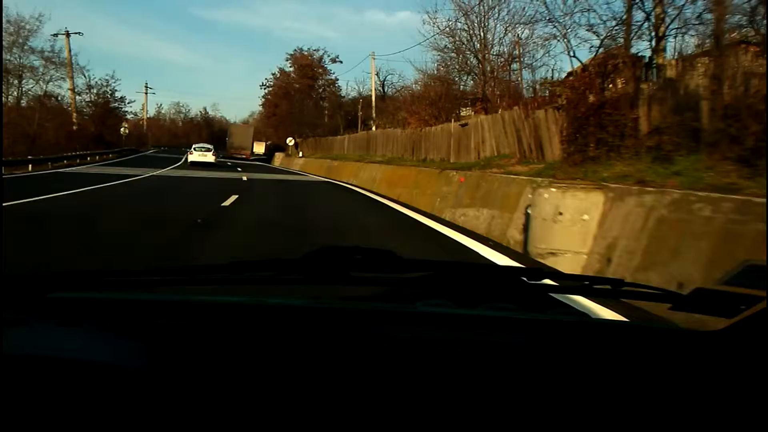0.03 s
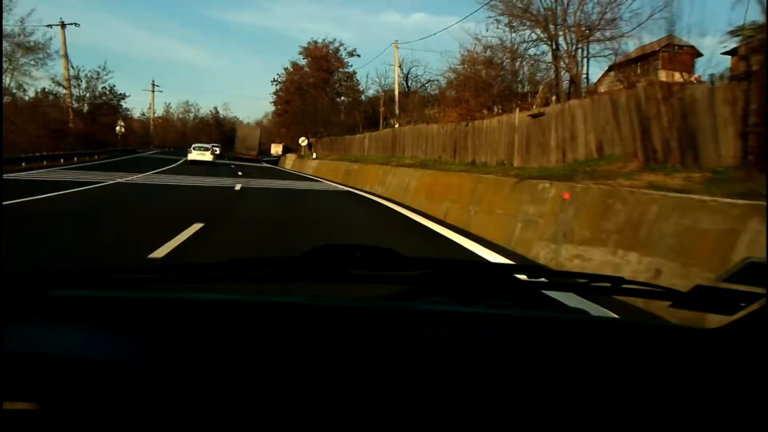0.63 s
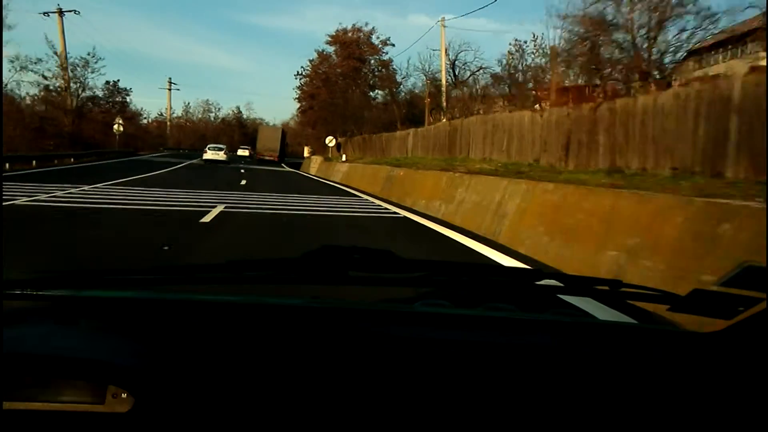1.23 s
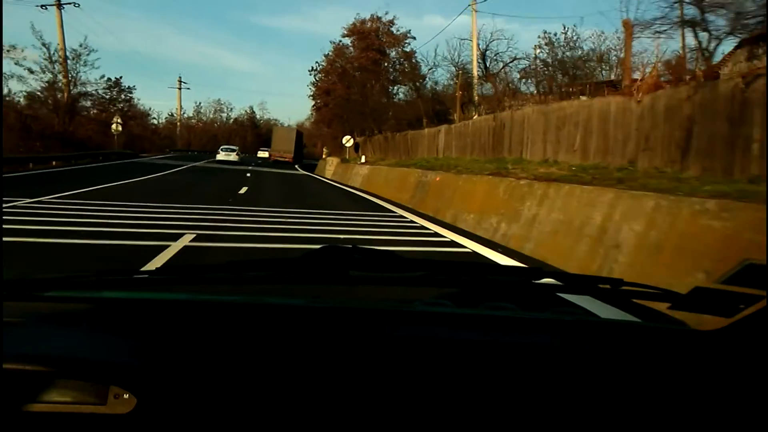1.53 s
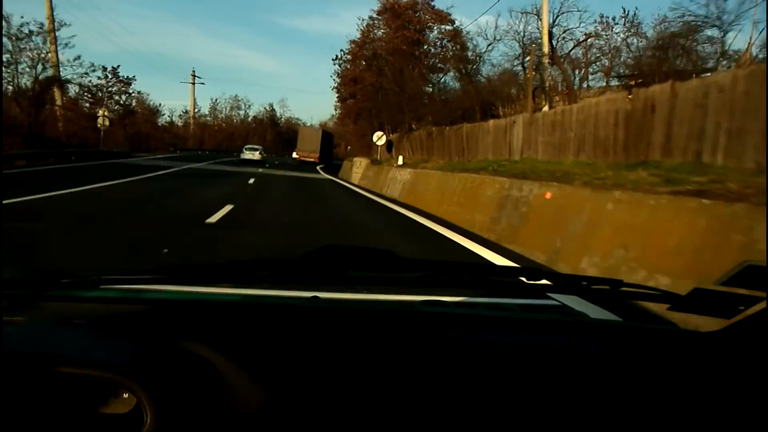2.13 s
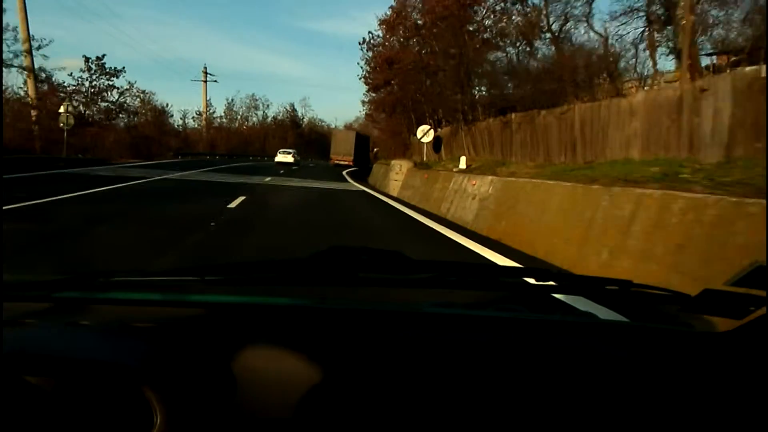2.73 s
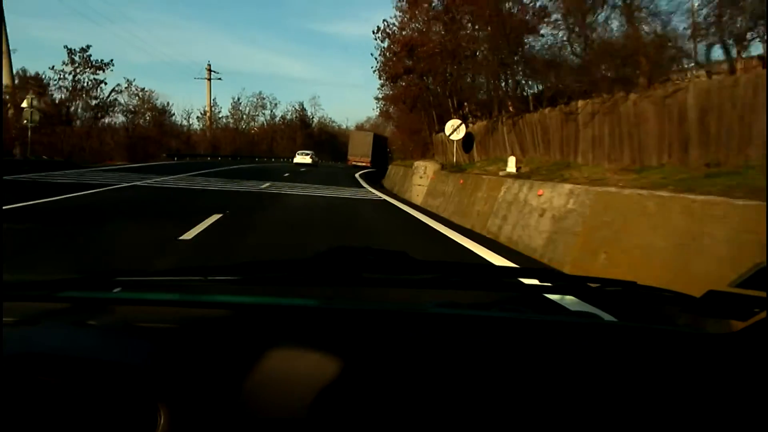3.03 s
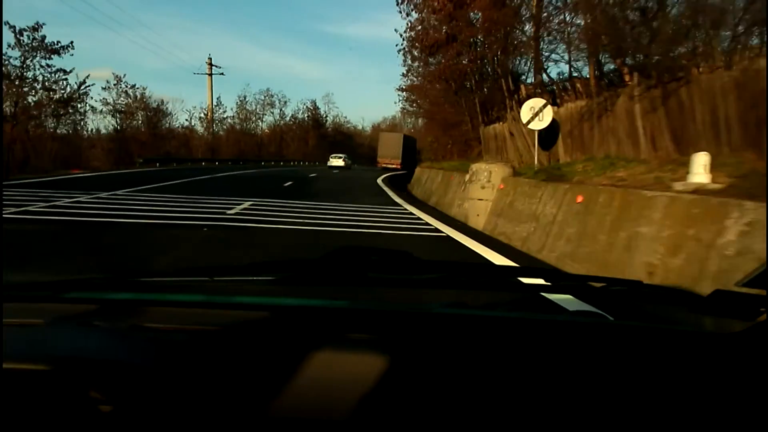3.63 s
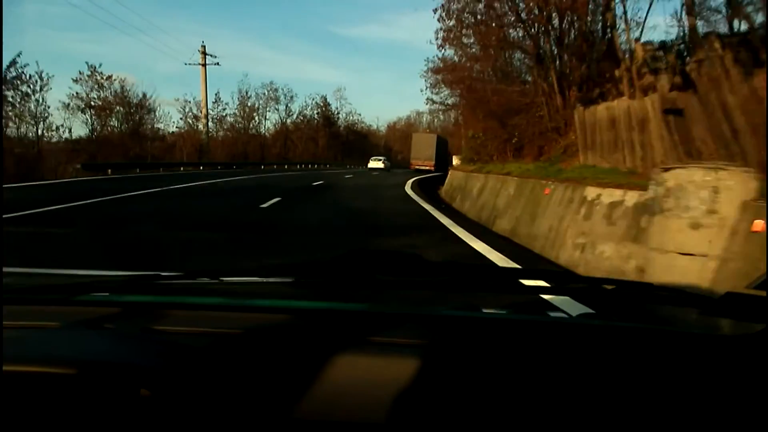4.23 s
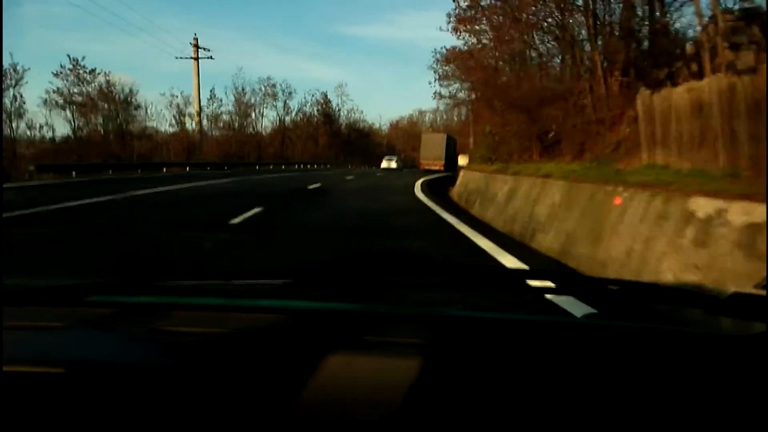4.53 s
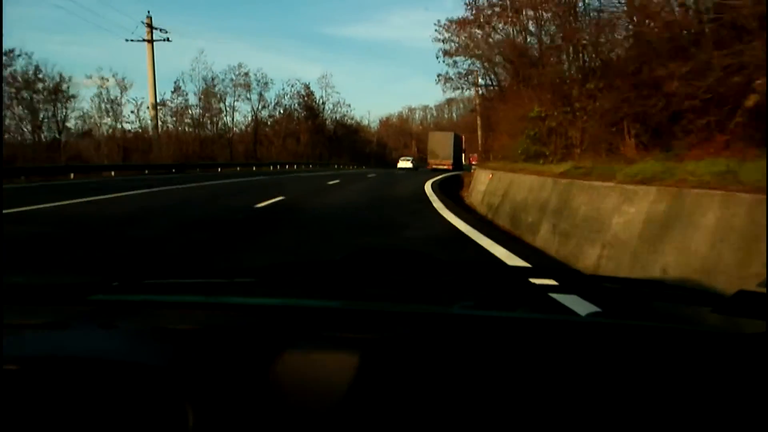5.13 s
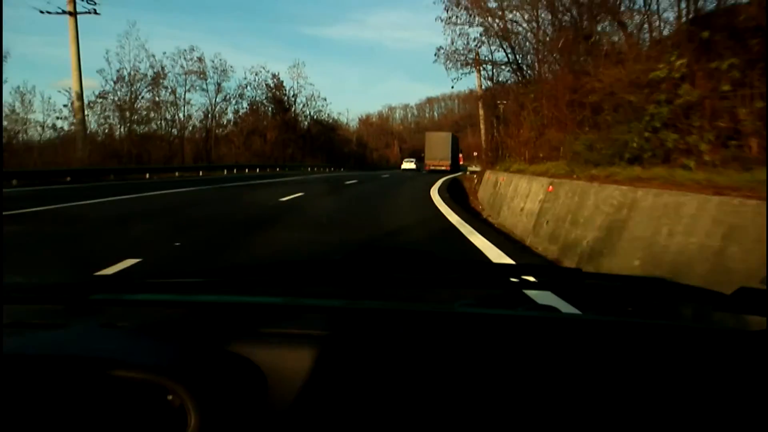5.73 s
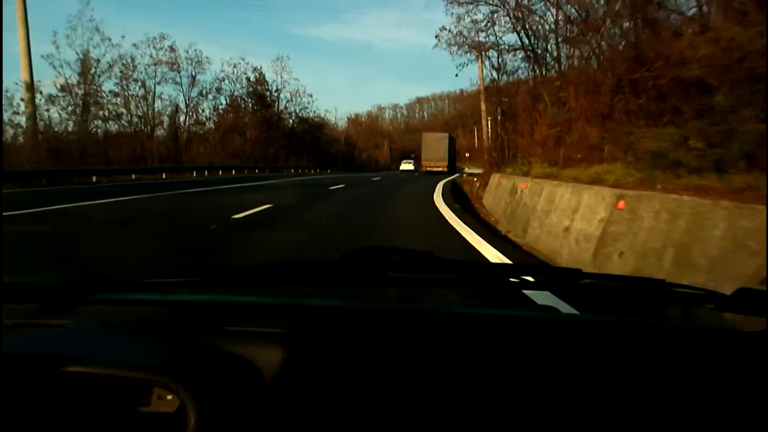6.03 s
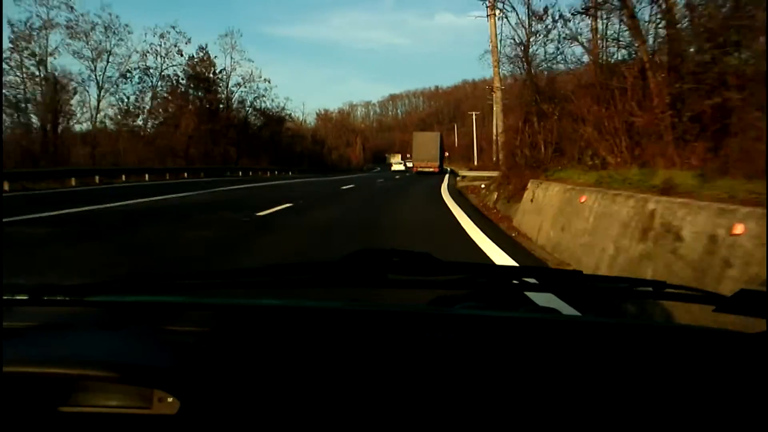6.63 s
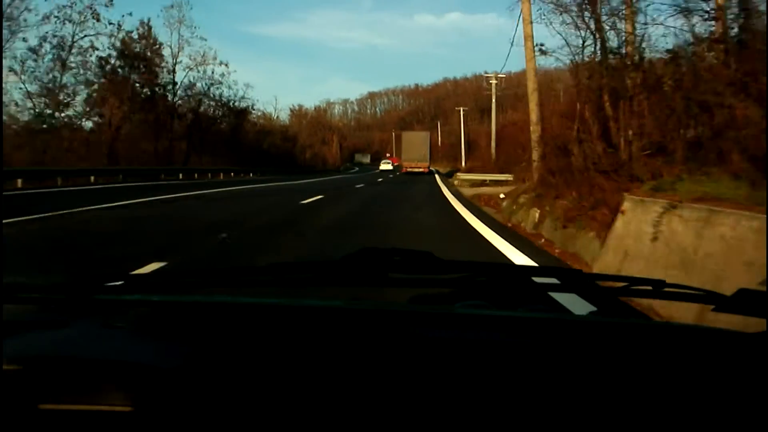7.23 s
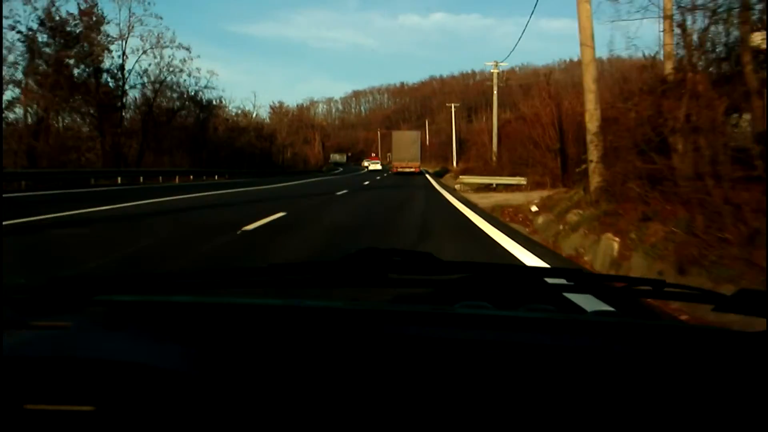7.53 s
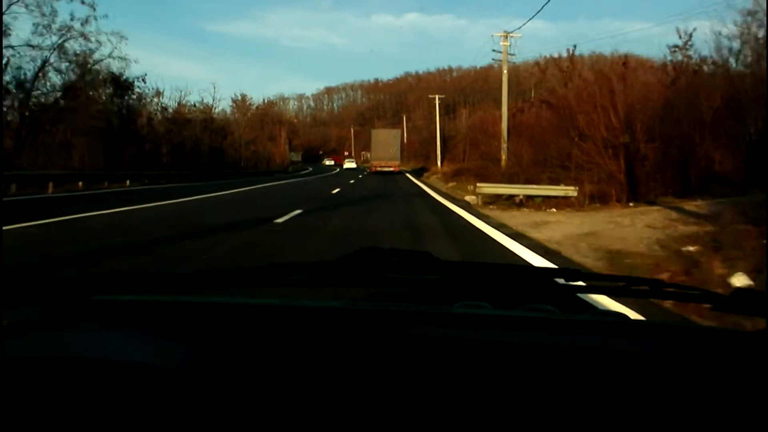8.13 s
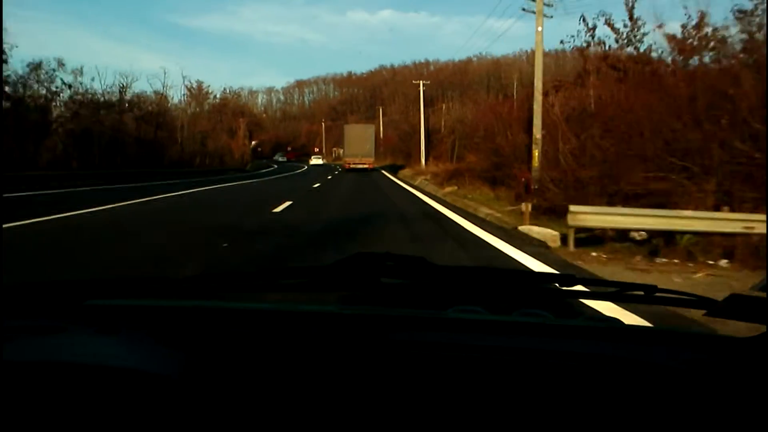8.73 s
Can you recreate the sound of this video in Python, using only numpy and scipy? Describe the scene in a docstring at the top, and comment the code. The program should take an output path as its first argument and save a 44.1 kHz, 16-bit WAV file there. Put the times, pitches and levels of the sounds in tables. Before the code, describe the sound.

Heard from behind the windscreen of a moving car, the engine drones and slowly rises in pitch over tyre roar and low body rumble. Three times in the first half, the wheels drum over groups of raised stripes, with rapid thumps, clacking dashboard plastic and tiny metallic jingles. After that, a loose piece of trim on the left starts a thin, high buzz as the car keeps gathering speed.

```python
"""Small car gathering speed on a main road

From behind the windscreen, the engine's firings drone over tyre roar and body rumble.
Three groups of raised stripes thump the wheels and rattle the dashboard plastic and small fittings.
As the revs climb, a loose bit of trim to the left of the microphone buzzes once per firing.
The recorder's gain ducks under the thumps and creeps back."""
import sys
import numpy as np
from scipy import signal
from scipy.fft import rfft, irfft
from scipy.io import wavfile
from scipy.ndimage import uniform_filter1d, minimum_filter1d, map_coordinates

SR = 44100
rng = np.random.default_rng(int(sys.argv[2]) if len(sys.argv) > 2 else 0)


def store_wav(level_fs):
    """Save 16-bit WAV to argv[1]."""
    pcm = np.round(np.clip(np.atleast_2d(level_fs), -1, 1) * 32767)
    wavfile.write(sys.argv[1], SR, pcm.T.astype(np.int16))


N = 396900
TIME = np.arange(N) / SR


def from_db(db):
    """Decibels to gain."""
    return 10 ** (np.asarray(db) / 20)


def rms_one(x):
    """Scale to unit rms."""
    return x / np.sqrt(np.mean(x ** 2) + 1e-20)


def bell(x, centre, half_width):
    """A smooth hump of height 1."""
    return np.exp(-((x - centre) / half_width) ** 2)


def in_time(points):
    """A curve of (seconds, value) points, sample by sample."""
    return np.interp(TIME, *np.transpose(points))


def at_hz(points, hz):
    """Read a table on a log-frequency axis."""
    f, value = np.transpose(points)
    return np.interp(np.log(hz), np.log(f), value)


def drift(rate):
    """A smooth random wander of spread about 1 that turns about rate times a second."""
    knots = rng.standard_normal(4096)
    return map_coordinates(knots, [TIME[::50] * rate], order=3, mode="wrap").repeat(50)[:N]


# The cabin at the stereo microphone. Each row: frequency in Hz, left-right correlation.
CABIN_LIKENESS = [(30, 0.95), (100, 0.99), (300, 0.98), (700, .95), (1500, 0.84), (3500, 0.85),
                  (6000, 0.61), (9000, 0.64), (10000, -0.13), (11500, -0.75), (16000, -0.35)]
def stereo_noise(spectrum):
    """Noise coloured by (Hz, dB) points, whose two sides part toward the treble; rms 1."""
    hz = np.maximum(np.fft.rfftfreq(N, 1 / SR), 1)
    outside = np.maximum(hz / spectrum[-1][0], spectrum[0][0] / hz).clip(1)
    mid, side = rfft(rng.standard_normal((2, N))) * from_db(at_hz(spectrum, hz)) / outside ** 2
    alike = np.clip(at_hz(CABIN_LIKENESS, hz), -1, 1)
    return rms_one(irfft(np.sqrt(1 + alike) * mid + np.sqrt(1 - alike) * side * [[1], [-1]], N))


def resonate(x, hz, width_hz):
    """Pass a sound through a two-pole resonance; rms 1."""
    r, w = np.exp(-np.pi * width_hz / SR), 2 * np.pi * hz / SR
    return rms_one(signal.lfilter([1, 0, -1], [1, -2 * r * np.cos(w), r * r], x))


def ring_modes(force, modes):
    """A force rings a set of (Hz, dB, t60) modes, neighbours in opposite phase."""
    out = 0
    for k, (hz, db, t60) in enumerate(modes):
        r, w = from_db(-60 / (t60 * SR)), 2 * np.pi * hz / SR
        ringing = signal.lfilter([0, np.sin(w)], [1, -2 * r * np.cos(w), r * r], force + 1e-18)
        out = out + (-1) ** k * from_db(db) * ringing
    return out


def taps(rows):
    """One click for each (seconds, dB) row."""
    s, db = np.transpose(rows)
    out = np.zeros(N)
    out[np.round(s * SR).astype(int)] = from_db(db)
    return out


def fade(clicks, t60):
    """Each click becomes a dying envelope of its own height."""
    return signal.lfilter([1], [1, -from_db(-60 / (t60 * SR))], clicks + 1e-18)


# The engine up ahead, pulling in one gear. Each row: time in seconds, firings per second.
FIRING_RATE = [(0, 81.6), (2.6, 89.3), (5.3, 95.9), (7, 99.55), (9, 104.2)]
def revs():
    """The climbing firing rate, and a running count of firings that wavers slightly."""
    firing_hz = in_time(FIRING_RATE)
    return firing_hz, np.cumsum(firing_hz * (1 + .001 * drift(9))) / SR


# The drone as it reaches the cabin. Each row: time in seconds, level in dB.
DRONE_LEVEL = [(0, -19.5), (1.4, -15), (2.1, -11), (2.55, -16), (3, -9), (3.3, -14.5), (3.75, -10),
               (4.15, -15), (4.8, -11), (5.3, -11), (6.2, -10), (6.55, -14.5), (6.9, -12), (7.15, -24.5),
               (7.45, -22.5), (7.75, -11.5), (9, -8)]
# Weaker engine lines. Each row: multiple of the firing rate, level in dB before any lift.
ENGINE_OVERTONES = [(2, -31), (3, -30.5), (4, -32.5), (4.5, -46.5), (5, -46), (6, -43.5), (7, -41.5),
                    (8, -49), (8.5, -45.5), (11, -47.5), (12, -47.5), (14, -50)]
# Panel resonances around the microphone. Each row: centre in Hz, half width in Hz, lift in dB.
CABIN_RESONANCES = [(252, 3, 8), (274.5, 3.5, 11), (339.5, 2.6, 14), (362, 6, 5), (522, 12, 7.5),
                    (778, 16, 3)]
GEAR_ORDER, GEAR_DB = 5.67, -35
def engine(firing_hz, firings):
    """The firing drone; overtones and gear whine swell as they sweep through the panel resonances."""
    def line(order, db, unsteady_db):
        gain = from_db(db + unsteady_db * drift(14))
        return gain * np.sin(2 * np.pi * (order * firings + rng.random()))
    out = line(1, in_time(DRONE_LEVEL), unsteady_db=0.96)
    for order, db in [*ENGINE_OVERTONES, (GEAR_ORDER, GEAR_DB)]:
        lift_db = sum(peak * bell(order * firing_hz, hz, width) for hz, width, peak in CABIN_RESONANCES)
        out = out + line(order, db + lift_db, unsteady_db=1.0)
    return out * from_db([[.2], [-.2]])


# The body's rumble, all around. Each row: frequency in Hz, relative density in dB.
RUMBLE_SPECTRUM = [(15, -0.5), (25, -32), (32, -1.5), (41, 2), (58, -0.5), (75, -9.5), (110, -8.5)]
# Uneven asphalt under the car. Each row: centre in seconds, half length in seconds, lift in dB.
ROUGH_PATCHES = [(3.05, .25, 3), (5.5, 0.17, 5.5), (6.298, 0.08, 6)]
def body_rumble():
    """The body rumbles, more on uneven asphalt and after each blow of the rear axle."""
    uneven_db = sum(db * bell(TIME, s, length) for s, length, db in ROUGH_PATCHES)
    gain = from_db(-20 + uneven_db) + from_db(-10) * body_shaking(t60=0.66)
    return gain * stereo_noise(RUMBLE_SPECTRUM)


# The tyres, heard from inside. Each row: frequency in Hz, relative density in dB.
ROAR_SPECTRUM = [(70, -10), (115, 3), (155, -3), (205, 2), (270, -4), (370, -3.5), (480, -9.5), (700, -15),
                 (1050, -18), (1500, -22.5), (2000, -30.5), (3000, -48)]
def tyre_roar(speed):
    """Rolling tyres roar louder with speed, which is 1 at its mean."""
    return from_db(-20.5 + 0.61 * drift(18)) * speed ** 1.4 * stereo_noise(ROAR_SPECTRUM)


# The hiss above the roar. Each row: frequency in Hz, relative density in dB.
HISS_SPECTRUM = [(1200, 1), (2200, 4), (3200, -1), (4500, -6.5), (6500, -10.5), (9000, -13.5), (10500, -14),
                 (12000, -16), (16000, -25)]
# Resonances of the engine bay ahead. Each row: centre in Hz, width in Hz, level in dB at top speed.
BAY_WHINES = [(714, 33, -45.5), (1124, 23, -44.5), (1412, 20, -44), (2230, 64, -50.5), (3270, 530, -52),
              (4190, 38, -58.5), (8180, 50, -58), (8380, 55, -59)]
def hiss_and_whine(speed, firings):
    """Hiss grows with speed, rings in the engine bay and pulses lightly with the firings."""
    pulsing = 1 + 0.091 * np.sin(2 * np.pi * firings)
    hiss = from_db(-43 + .5 * drift(25)) * speed ** 0.57 * stereo_noise(HISS_SPECTRUM)
    flat_noise = stereo_noise([(800, 0), (10000, 0)])
    whine = sum(from_db(db) * resonate(flat_noise, hz, width) for hz, width, db in BAY_WHINES)
    return pulsing * (hiss + whine * (speed / speed.max()) ** 3.8)


# Groups of stripes under the front axle; the car is already on the first as the scene opens.
# Each row: start in seconds, relative boom in dB, relative knock in dB.
STRIPE_GROUPS = [(-.27, -1, -16), (2.052, 0.5, 0.5), (4.238, 0.5, 1.5)]
BOOM_COLUMN, KNOCK_COLUMN = 1, 2
STRIPE_COUNT, STRIPE_GAP_S, REAR_LAG_S = 6, .072, .182
def axle_hits(column, db, lag_s=0):
    """One click for every stripe that an axle crosses, evenly spaced and slightly uneven in force."""
    rows = np.array([(group[0] + lag_s + k * STRIPE_GAP_S,
                      db + group[column] - 0.3 * rng.standard_normal())
                     for group in STRIPE_GROUPS for k in range(STRIPE_COUNT)])
    return taps(rows[rows[:, 0] >= 0])


def body_shaking(t60):
    """How hard the body shakes: renewed by each blow of the rear axle, then dying; peak 1."""
    level = uniform_filter1d(fade(axle_hits(BOOM_COLUMN, 0, REAR_LAG_S), t60), size=800)
    return level / level.max()


# Modes of the body around the microphone, then of the tyres below it.
# Each row: frequency in Hz, relative level in dB, t60 in seconds.
BODY_MODES = [(30, -10, .15), (42, -1.5, .26), (58, -6, .16)]
TYRE_MODES = [(128.3, 3, 0.18), (128.4, 2, 0.17), (180, -7, 0.086), (217, -8.5, 0.037),
              (340.5, -17.5, 0.12)]
SUSPENSION_HZ = 75
def stripes():
    """Each stripe knocks front tyres, then rear, and booms the body through the soft suspension."""
    blows = axle_hits(BOOM_COLUMN, db=-11) + axle_hits(BOOM_COLUMN, db=-2, lag_s=REAR_LAG_S)
    softened = signal.sosfilt(signal.butter(2, SUSPENSION_HZ, fs=SR, output="sos"), blows + 1e-18)
    boom = ring_modes(softened, BODY_MODES)
    edges = axle_hits(KNOCK_COLUMN, db=-2.1) + axle_hits(KNOCK_COLUMN, db=-6, lag_s=REAR_LAG_S)
    # the tread rolls over the edge for a moment, so the knock is a rough push
    push = fade(edges, t60=.07) * rng.standard_normal(N)
    knock = from_db(-22) * ring_modes(push, TYRE_MODES)
    return signal.sosfilt(signal.butter(2, [18, 420], "band", fs=SR, output="sos"), boom + knock)


# The dashboard, close by and slightly right.
# Each row: start in seconds, relative contact level in dB, relative snap level in dB.
DASH_CLACKS = [(0.123, -23, -48), (0.207, -47, -62), (0.254, -27, -48), (0.2906, -17.5, -46),
               (0.3237, -23.5, -44), (0.349, -23, -50), (2.221, -30, -48), (2.2433, -32, -46),
               (2.2647, -20, -47), (2.3413, -21, -52), (2.4126, -20.5, -45), (2.4838, -22.5, -46),
               (2.5496, -18, -40), (2.6274, -24, -52), (4.3335, -35, -42.5), (4.445, -25, -48),
               (4.492, -30, -39.5), (4.514, -23, -52), (4.584, -21, -44), (4.6287, -22, -41),
               (4.659, -22, -47), (4.7342, -17.5, -47), (4.807, -36, -57)]
# Its plastic. Each row: frequency in Hz, relative level in dB, t60 in seconds.
PLASTIC_MODES = [(1292, -9.5, 0.055), (1610, -6, 0.035), (1930, -10, 0.021), (2470, -3.5, 0.0097),
                 (2690, -4, 0.025), (2790, -5.5, 0.028), (3414, -4.5, 0.013), (3580, -7.5, 0.0092),
                 (4670, -11.5, .01), (5900, -20, .006)]
# The crisp snap of a contact. Each row: frequency in Hz, relative density in dB.
SNAP_SPECTRUM = [(1200, 4), (3000, 5), (6000, 0), (8000, -4), (10300, -3), (11500, -8), (16000, -18)]
# Its hollow parts. Each row: centre in Hz, width in Hz, relative level in dB.
HOLLOW_RESONANCES = [(1250, 100, -3), (1600, 110, -0.5), (2710, 450, -8)]
def dashboard():
    """Plastic scuffles on plastic in short clacks; loose fittings chatter while the body shakes."""
    clacks = np.array(DASH_CLACKS)
    contact = fade(taps(clacks[:, [0, 1]]), t60=0.032) * stereo_noise([(900, 0), (9000, 0)])
    plastic = from_db(-18.5) * ring_modes(contact, PLASTIC_MODES)
    snap_envelope = uniform_filter1d(fade(taps(clacks[:, [0, 2]]), t60=0.087), size=60)
    snap = from_db(8) * snap_envelope * stereo_noise(SNAP_SPECTRUM)
    ticks = rms_one(from_db(5 * drift(400).clip(-2, 2)) * stereo_noise(SNAP_SPECTRUM))
    hollow = sum(from_db(db) * resonate(ticks, hz, width) for hz, width, db in HOLLOW_RESONANCES)
    chatter = from_db(-40) * body_shaking(t60=0.23) * (ticks + from_db(5) * hollow)
    return (plastic + snap + chatter) * from_db([[-.9], [.9]])


# A small metal part, a little to the right. Each row: start in seconds, relative level in dB.
METAL_JIGGLES = [(.09, -36), (.258, -39.5), (.292, -45), (.335, -43), (2.343, -46), (2.44, -48),
                 (2.555, -48), (2.627, -42), (4.515, -40), (4.538, -40), (4.668, -30.5), (4.688, -40),
                 (4.757, -45), (4.812, -43)]
# Its ring. Each row: frequency in Hz, relative level in dB, t60 in seconds.
METAL_MODES = [(8980, 0.5, .02), (9550, -18, 0.02), (10060, 5.5, .025)]
def metal_jingle():
    """Brief rough contacts ring the high modes of a metal part."""
    jiggle = fade(taps(METAL_JIGGLES), t60=0.022) * stereo_noise([(5000, 0), (14000, 0)])
    return from_db(-18.5) * ring_modes(jiggle, METAL_MODES) * from_db([[-1.5], [1.5]])


# A hollow panel, heard in the centre. Each row: start in seconds, level in dB.
PANEL_BLOW = [(.148, -14)]
# Its ring. Each row: frequency in Hz, relative level in dB, t60 in seconds.
PANEL_MODES = [(880, 0, .05), (1010, -1, .04)]
def panel_knock():
    """One blow rings the panel's two short-lived modes."""
    return ring_modes(taps(PANEL_BLOW), PANEL_MODES)


# Trim around the cabin. Each row: start in seconds, level in dB.
TRIM_CREAKS = [(.272, -40), (.95, -44), (1.953, -43), (2.94, -44), (3.01, -42), (3.08, -44), (3.131, -43),
               (5.473, -43), (5.588, -36.5)]
def trim_creaks():
    """The trim creaks faintly in dying bursts of bright noise."""
    envelope = fade(taps(TRIM_CREAKS), t60=0.14)
    return envelope * stereo_noise([(2500, 3), (8000, -4), (10500, -3), (14000, -18)])


# Trim working loose, left of the microphone. Each row: time in seconds, base level in dB.
BUZZ_LEVEL = [(4.8, -58.5), (5.3, -53), (6.2, -54), (7.1, -53.5), (7.8, -49), (9, -46.5)]
# Its brief flares. Each row: centre in seconds, lift in dB.
BUZZ_FLARES = [(4.92, 11), (5.55, 5), (5.98, 12.5), (6.22, 8), (6.37, 6), (6.42, 9.5), (6.58, 4),
               (6.67, 8.5), (6.79, 11.5), (6.92, 10), (7.02, 7), (7.09, 6), (7.16, 12.5), (7.25, 7),
               (7.33, 8), (7.40, 7), (7.49, 9), (7.60, 6), (8.77, 6), (8.90, 5)]
# The rasp around its squeak, then its sharp top. Each row: frequency in Hz, relative density in dB.
RASP_SPECTRUM = [(4300, -16), (5000, -6), (5600, 1), (6400, -3), (7200, -13)]
TOP_SPECTRUM = [(9000, -25), (10700, -0.5), (12500, -2), (14000, 3), (15500, -2)]
SQUEAK_HZ, TOP_DB_PER_DB = 5845, 0.52
def trim_buzz(firings):
    """Loose trim squeaks once per firing, each time with its own force; hard scrapes are sharper."""
    loose_db = in_time(BUZZ_LEVEL)
    onset = np.clip((TIME - BUZZ_LEVEL[0][0]) * 20, 0, 1)
    flare_db = sum(db * bell(TIME, s, half_width=0.014) for s, db in BUZZ_FLARES)
    force_db = 2.5 * rng.standard_normal(2048).clip(-2, 2)[firings.astype(int) % 2048]
    flutter_db = 1.8 * drift(22)
    gain = onset * from_db(loose_db + flare_db + flutter_db + force_db)
    scrape = rms_one(bell(firings % 1, 0.61, 0.21))
    squeak_phase = 2 * np.pi * np.cumsum(SQUEAK_HZ + 95 * drift(500)) / SR
    squeak = rms_one(np.sin(squeak_phase)) * from_db([[5], [-13]])
    rasp = from_db(-2.5) * np.array([stereo_noise(RASP_SPECTRUM)[side] for side in range(2)])
    # much of the sharp top reaches the two sides in opposite phase
    top = stereo_noise(TOP_SPECTRUM) + 0.52 * stereo_noise(TOP_SPECTRUM)[0] * np.array([[1], [-1]])
    sharpness = from_db(TOP_DB_PER_DB * (loose_db + force_db - BUZZ_LEVEL[-1][1]))
    top_pulse = sharpness * rms_one(bell(firings % 1, .5, 0.15))
    return gain * (scrape * (squeak + rasp) + top_pulse * top * from_db([[-2.5], [-4]]))


def scene():
    """Everything that reaches the microphone behind the windscreen."""
    firing_hz, firings = revs()
    speed = firing_hz / firing_hz.mean()
    bumps = stripes() + dashboard() + metal_jingle() + panel_knock() + trim_creaks()
    drone = engine(firing_hz, firings)
    road = body_rumble() + tyre_roar(speed) + hiss_and_whine(speed, firings)
    return drone + road + bumps + trim_buzz(firings)


START_S, CUTOFF_HZ = .077, 15900
CEILING, HOLD_S, RECOVER_DB_PER_S = 0.94, 0.15, 9.5
def record(dry):
    """The recorder opens after a moment; its gain ducks under peaks and creeps back; the top is cut."""
    opened = dry * np.clip((TIME - START_S) * 2000, 0, 1)
    needed_db = -20 * np.log10(np.maximum(np.abs(opened).max(axis=0) / CEILING, 1))
    half_hold = int(HOLD_S * SR / 2)
    held_db = minimum_filter1d(needed_db, size=2 * half_hold + 1, origin=half_hold)
    recovery_db = RECOVER_DB_PER_S * TIME
    gain_db = np.minimum.accumulate(held_db - recovery_db) + recovery_db
    gain = from_db(uniform_filter1d(minimum_filter1d(gain_db, size=300), size=300))
    return signal.sosfilt(signal.ellip(10, .1, 80, CUTOFF_HZ, fs=SR, output="sos"), opened * gain)


dry = scene()
out = record(dry)
store_wav(out)
```